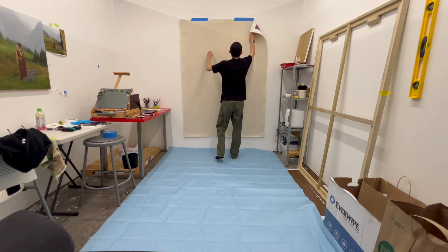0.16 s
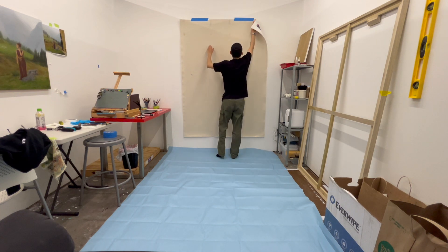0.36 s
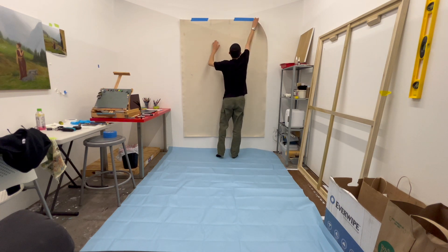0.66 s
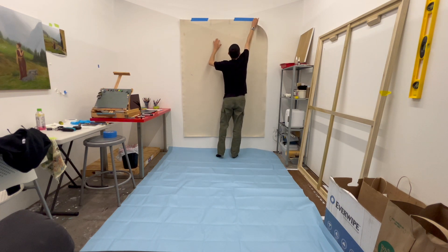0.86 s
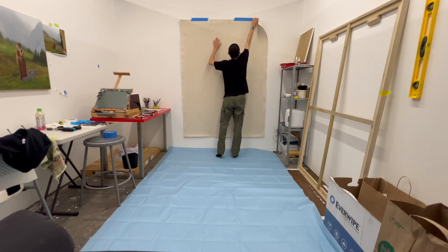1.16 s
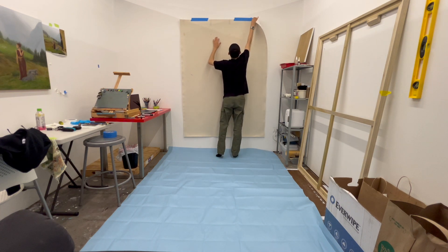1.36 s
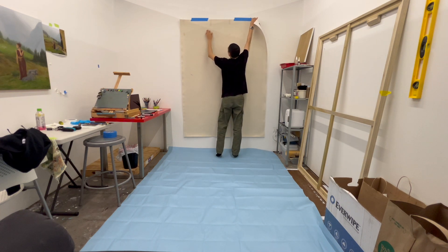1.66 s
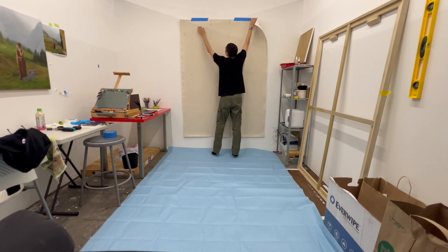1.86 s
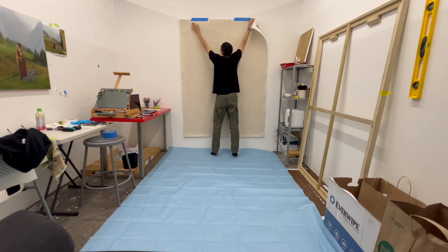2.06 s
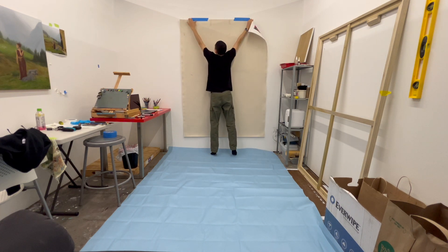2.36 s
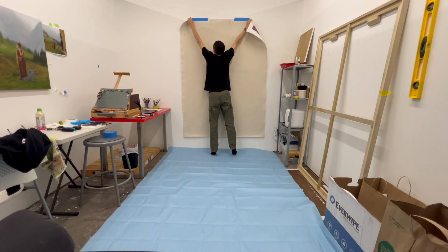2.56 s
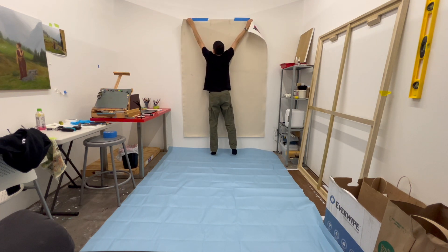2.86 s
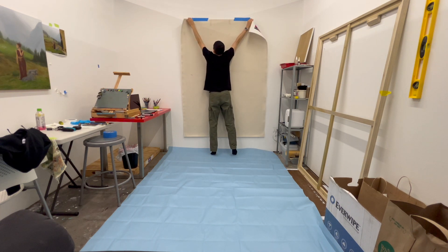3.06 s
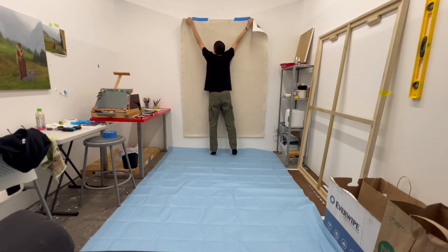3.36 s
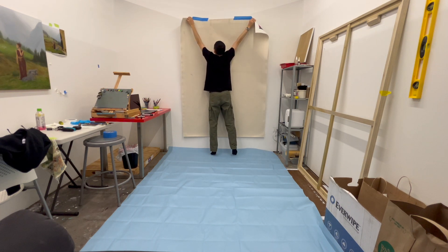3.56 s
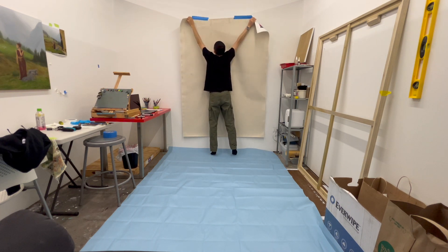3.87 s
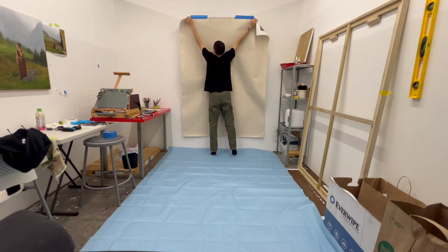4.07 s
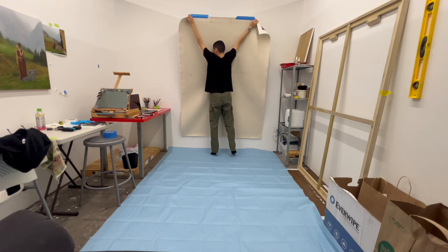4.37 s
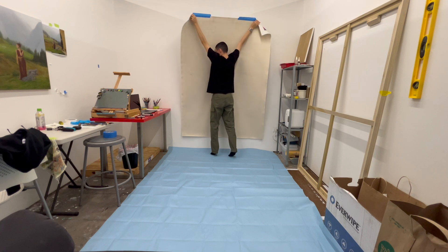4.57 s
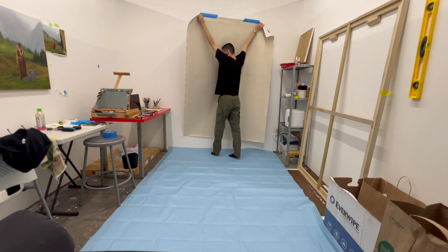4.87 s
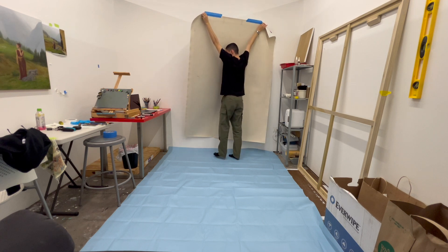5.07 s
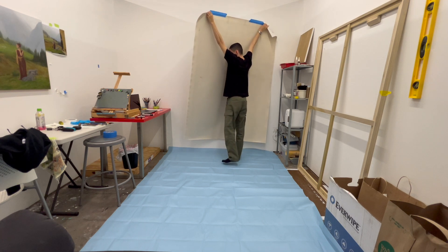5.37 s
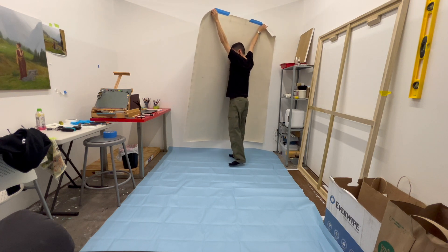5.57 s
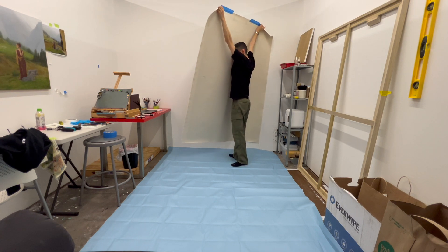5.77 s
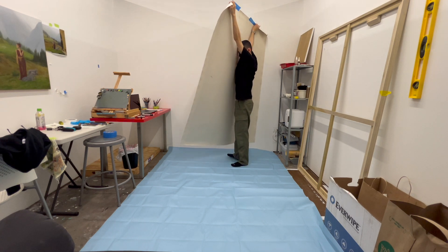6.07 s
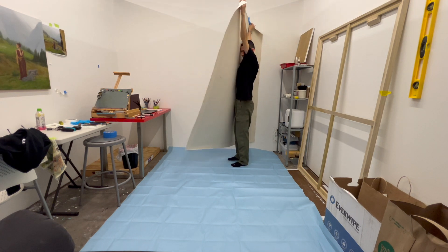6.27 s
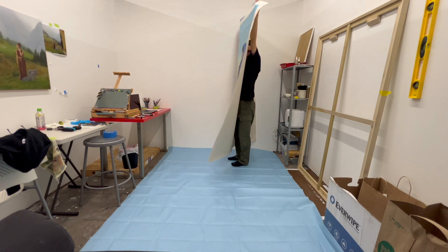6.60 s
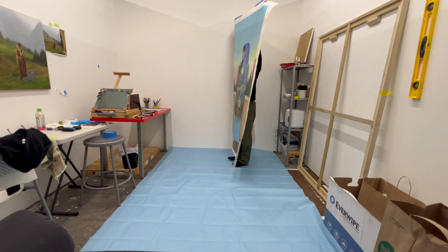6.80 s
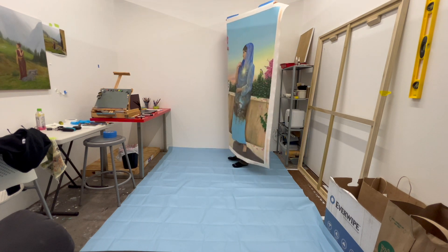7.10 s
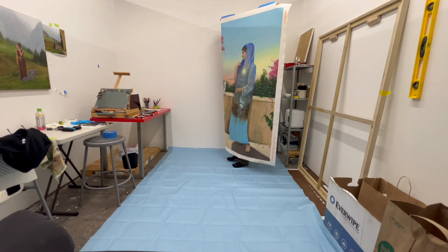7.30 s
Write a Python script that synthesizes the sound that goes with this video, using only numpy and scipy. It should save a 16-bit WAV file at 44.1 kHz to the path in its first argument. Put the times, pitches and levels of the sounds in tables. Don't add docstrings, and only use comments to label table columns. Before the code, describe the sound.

A low, steady fan hum with soft air noise runs throughout in a small bare studio, heard by a phone a few metres away with a short, blurring room echo. At 0 s a hand brushes cloth briefly, with a fainter stroke near 0.4 s. Around 1.1-1.35 s masking tape is tugged: a bright, dry crackle with sharp snaps and small creaks. Soft brushing fills 1.4-2.5 s. At 2.6 s a second peel starts with a snap, thin and fine at first, then rougher from 2.9 s, swelling at 3.3-3.5 s into dense crackling and hollow cloth drumming. Dull knocks follow at 3.6-3.8 s, and a last strong snatch with a thump at 3.85 s. From 4 s the freed canvas rustles in soft separate swishes, with faint knocks and snaps near 4.6, 5.0 and 5.6 s. A broader, smoother swish around 6.1-6.8 s turns it, then mostly hum remains.

```python
import sys
import numpy as np
from scipy import signal
from scipy.fft import rfft, irfft
from scipy.io import wavfile
from scipy.ndimage import uniform_filter1d

SR = 44100
rng = np.random.default_rng(int(sys.argv[2]) if len(sys.argv) > 2 else 0)


def waveform_to_disk(signal):
    frames = np.transpose(np.atleast_2d(signal))
    scaled = np.clip(frames, -1, 1) * 32767
    samples = np.round(scaled).astype(np.int16)
    wavfile.write(sys.argv[1], SR, samples)


def volts_from_db(level):
    exponent = np.asarray(level, float) / 20
    return 10 ** exponent


N = 328104
T = np.arange(N) / SR
HZ = np.maximum(np.arange(N // 2 + 1) * SR / N, 1)

# frequency in Hz, level in dB per Hz.
AIR = [(20, -31), (40, -4), (80, -14.5), (105, -8), (194, -11.5), (400, -18), (861, -28.5), (1300, -29),
       (2450, -34.5), (7000, -42.5), (8490, -44.5), (10000, -55), (13600, -62.5), (16000, -76.5)]
AIR_DB = -48.5
# centre in Hz, width in Hz, level in dB.
DUCT = [(42.55, 3, -61.5), (61.7, 29, -54.5), (148.1, 15, -53.5), (200.4, 20.4, -56.5)]
# frequency in Hz, level in dB, wobble in Hz.
MOTOR = [
    (57.6, -44, .1),
    (119.8, -60, .1),
]

# start in seconds, rise in seconds, fall in seconds,
# level in dB, brightness in dB.
STROKES = [(0.0, .01, 0.049, -51.5, -4), (0.35, .09, 0.14, -57.5, -8), (0.6, 0.18, 0.28, -73.5, 8.5),
           (0.98, 0.069, .06, -55, -11), (1.42, .1, .9, -56, -3), (1.84, 0.059, 0.25, -52, -6.5),
           (2.12, .3, 0.23, -68, 13.5), (2.42, 0.12, 0.68, -66, 1.5), (2.61, 0.027, .03, -58, -3),
           (3.99, .05, 0.14, -49, -7), (4.21, 0.19, 0.2, -52.5, -4.5), (4.5, .2, .1, -61, -6),
           (4.563, 0.02, 0.055, -52.5, -7.5), (4.76, 0.13, .03, -63, -9), (5.035, 0.23, 0.1, -56.5, -9),
           (5.56, 0.22, .15, -55.5, -16), (5.635, .035, 0.063, -48, -4.5), (5.72, .06, 0.14, -49, -1),
           (5.82, 0.14, 0.11, -51.5, -3), (5.97, 0.2, 0.36, -53, -7.5), (6.4, 0.39, 0.43, -46.5, -6.5),
           (6.72, 0.32, 0.12, -55, -3.5)]
STROKE_CURVE = 0.84
# frequency in Hz, level in dB per Hz.
WEAVE = [(470, -34), (800, -11.5), (1300, -12.5), (2210, -12.5), (6490, -7), (7640, -3), (8340, -3),
         (14300, -23), (16000, -19)]

# start in seconds, hold in seconds,
# film crackle in dB, weave buzz minus crackle in dB, cloth drum minus crackle in dB.
SNATCHES = [
    (0.98, 0.026, -53, -14, -30),
    (1.128, .01, -40, -9, -28),
    (2.614, .025, -43.5, -27, -40),
    (3.602, .02, -39.5, 1, 3.5),
    (3.848, 0.0069, -27, 0.5, -6),
]
# start in seconds, hold in seconds,
# film crackle in dB, weave buzz minus crackle in dB, cloth drum minus crackle in dB.
TUGS = [(1.155, .01, -37, -11, -26), (1.185, 0.015, -37, -8, -10), (1.23, 0.0089, -40.5, -6, -11),
        (1.262, 0.0077, -38.5, -3, -4), (1.328, 0.022, -51, -1.5, -5), (2.685, 0.021, -48.5, -25, -40),
        (2.77, 0.047, -57, -13, -18), (2.864, 0.032, -47.5, -4.5, -14), (2.949, 0.027, -40, -8, -8),
        (3.028, 0.029, -38, -12.5, -11), (3.086, 0.08, -39, 3.5, -7.5), (3.21, 0.057, -39.5, -1.5, -1.5),
        (3.279, 0.025, -36, 0, -1.5), (3.323, 0.015, -31.5, 0, 0.5), (3.352, 0.023, -28, -1, -2),
        (3.442, 0.011, -30, -11, -7.5), (3.48, 0.0073, -24.5, -7.5, -4), (3.563, 0.029, -42.5, -11, -9),
        (3.647, 0.02, -38, -2, 3), (3.733, 0.013, -37, -0.5, 0.5), (3.795, 0.018, -38.5, -8, 0),
        (3.938, .04, -48, -23, -24.5)]
TUG_RISE_S, SNATCH_RISE_S, TUG_RELEASE_S, TUG_CURVE = 0.098, 0.024, 0.15, 3.52
# frequency in Hz, level in dB per Hz.
FILM = [(1300, -19), (2000, -10.5), (3000, -8.5), (4200, -7), (5900, -3), (7600, -4), (8500, -2.5),
        (10900, -14.5), (14100, -19), (16000, -25.5)]
# centre in Hz, width in Hz, level in dB.
BUZZ = [(1200, 120, 2), (1870, 55, -1), (1470, 1100, 4.5)]
BRIGHT_HZ, FULL_HZ = 7700, 3900
BRIGHT_DB, DULL_SHARE = 2.5, 0.56
THIN_BELOW_DB, THIN_SLOPE = -14, 1.3

# centre in Hz, width in Hz, level in dB.
DRUM = [(230.6, 38, -8), (312.4, 8.9, -0.5), (380, 21.6, -0.5), (512, 56, -14), (594, 13.2, -5),
        (810, 310, -10)]
SLACK_S, TAUT_DB, SLACK_DB = 3.7, 2, -4.5

# start in seconds, peak in dB, centre in Hz.
SNAPS = [(1.128, -44, 7000), (1.168, -24, 6000), (1.191, -14.5, 6640), (1.205, -20.5, 6430),
         (1.225, -27.5, 5800), (2.618, -22.5, 7200), (2.6245, -31, 5200), (2.857, -43.5, 6000),
         (2.952, -36.5, 6800), (3.728, -39.5, 5800), (3.851, -23, 4500), (4.559, -37.5, 1880),
         (5.03, -44.5, 1620), (5.2416, -40.5, 3800), (5.619, -42, 4000)]
# start in seconds, peak in dB, centre in Hz.
CREAKS = [(1.157, -25.5, 2780), (1.176, -32, 1780), (1.192, -32, 1760), (1.203, -32, 2120),
          (1.255, -28, 5790), (2.635, -40, 6500), (2.64, -32.5, 4820), (2.667, -32.5, 5020),
          (2.678, -29, 9000), (3.06, -34.5, 1200), (3.12, -30.5, 1870), (3.17, -34, 1200),
          (3.28, -23.5, 635), (3.36, -21, 627)]
# start in seconds, peak in dB, centre in Hz.
KNOCKS = [(3.32, -28, 380), (3.345, -29, 360), (3.375, -27, 372), (3.597, -18.5, 380), (3.627, -28, 380),
          (3.66, -30.5, 387), (3.715, -23.5, 400), (3.738, -31, 390), (3.753, -25.5, 400),
          (3.793, -26, 370), (3.85, -15, 388), (3.874, -23, 400), (4.383, -36.5, 392), (4.563, -34, 307),
          (5.04, -40, 314)]

DIRECT_DB, WET_DB = 3.5, 1
T60_LOW_S, T60_HIGH_S, SPLIT_HZ = 0.23, 0.17, 4000
PORT_LAG = 28
SPOT_LAGS = [PORT_LAG, PORT_LAG, -5, 12, -19]

# frequency in Hz, likeness from -1 (opposite) to 1 (same).
LIKENESS = [(60, .9), (170, .9), (260, .75), (400, .3), (600, -.1), (950, -.4), (1250, 0), (10000, 0),
            (10800, -.75), (11300, -.8), (11900, 0), (12400, .95), (14300, .95), (15000, 0)]
# frequency in Hz, left minus right in dB.
LEAN = [(60, -.2), (260, -1.2), (450, 2), (2400, 2), (3600, 3.5), (5000, 8.5), (8500, 5.5), (9800, -1),
        (11000, 0)]
# centre in Hz, width in Hz, left in dB, right in dB.
NOTCH = [(1314, 110, 3, 5), (1810, 220, 4, 3), (5230, 157, -6, -10.5), (7650, 360, -16.5, -14),
         (11900, 750, 0, 0)]
TOP_HZ = 15400


def unit(x):
    return x / np.sqrt(np.mean(x ** 2))


def along(table):
    hz, value = np.transpose(table)
    return np.interp(np.log(HZ), np.log(hz), value)


def shape(x, gain):
    return irfft(rfft(x) * gain, N)


def tilt(x, db, hz, order):
    share = shape(x, 1 / (1 + (hz / HZ) ** order))
    return x + (volts_from_db(db) - 1) * share


def peak(hz, width):
    return 1 / (1 + 1j * (HZ ** 2 - hz ** 2) / (HZ * width))


def body(modes):
    return sum((-1) ** k * volts_from_db(db) * peak(hz, width) for k, (hz, width, db) in enumerate(modes))


def walk(rate):
    k = int(SR / rate)
    steps = np.repeat(rng.standard_normal(N // k + 1), k)
    return 1.42 * uniform_filter1d(uniform_filter1d(steps, k), k)[:N]


def slips(rate, spread_db):
    happens = rng.random(N) < rate / SR
    sign = rng.standard_normal(N)
    size = rng.exponential(size=N)
    return happens * sign * volts_from_db(spread_db * np.minimum(size, 3))


def steady(x, size):
    power = uniform_filter1d(uniform_filter1d(x ** 2, size), size)
    return x / np.sqrt(power)


def played(s, rise, hold, fall, curve, db, *columns):
    t = T[::32, None]
    coming = 1 + (t - s) / rise
    going = 1 + (s + hold - t) / fall
    power = volts_from_db(2 * db) * np.clip(np.minimum(coming, going), 0, 1) ** (2 * curve)
    total = power.sum(axis=1) + 1e-18
    curves = [np.sqrt(total)] + [power @ c / total for c in columns]
    return [np.interp(T, t[:, 0], c) for c in curves]


def ventilation():
    air = volts_from_db(AIR_DB) * unit(shape(rng.standard_normal((2, N)), volts_from_db(along(AIR))))
    duct = 0
    for hz, width, db in DUCT:
        rumble = unit(shape(rng.standard_normal((2, N)), peak(hz, width) ** 2))
        duct = duct + volts_from_db(db + 1.46 * walk(3)) * rumble
    motor = 0
    for hz, db, wobble in MOTOR:
        phase = 2 * np.pi * np.cumsum(hz + wobble * walk(1.8)) / SR
        motor = motor + volts_from_db(db + 0.85 * walk(1.6)) * np.sin(phase)
    return air + duct + motor


def brushing():
    s, rise, fall, db, bright_db = np.transpose(STROKES)
    level, bright_db = played(s, rise, 0, fall, STROKE_CURVE, db, bright_db)
    grains = slips(9000, 1.3) * volts_from_db(0.62 * walk(30))
    weave = unit(shape(grains, volts_from_db(along(WEAVE))))
    return volts_from_db(1.5) * level * tilt(weave, bright_db, 4800, order=6)


def tugs():
    s, hold, db, buzz_db, drum_db = np.transpose(TUGS + SNATCHES)
    rise = np.repeat([TUG_RISE_S, SNATCH_RISE_S], [len(TUGS), len(SNATCHES)])
    return played(s, rise, hold, TUG_RELEASE_S, TUG_CURVE, db, buzz_db, drum_db)


def tape():
    pull, buzz_db, _ = tugs()
    full_db = THIN_SLOPE * np.minimum(buzz_db - THIN_BELOW_DB, 0)
    fine = slips(8000, 4.1) * volts_from_db(1.4 * walk(130))
    film = steady(shape(fine, volts_from_db(along(FILM))), size=900)
    film = tilt(film, BRIGHT_DB + DULL_SHARE * full_db, BRIGHT_HZ, order=10)
    film = tilt(film, full_db, FULL_HZ, order=-14)
    coarse = slips(1200, 4.7) * volts_from_db(1.5 * walk(70))
    buzz = steady(shape(coarse, body(BUZZ)), size=1200)
    return pull * volts_from_db(4.5) * (film + volts_from_db(buzz_db - 5) * buzz)


def canvas():
    pull, _, drum_db = tugs()
    upper_db = np.interp(T, [SLACK_S - 0.03, SLACK_S + 0.025], [TAUT_DB, SLACK_DB])
    drum = steady(shape(slips(200, 1.7), body(DRUM) * peak(464, 827)), size=1500)
    return pull * volts_from_db(drum_db - 0.5) * tilt(drum, upper_db, 740, order=10)


def hits(table, burst_s, sharpness, boost_db):
    out, t = np.zeros(N + SR), np.arange(SR // 8) / SR
    for s, db, hz in table:
        burst = rng.standard_normal(len(t)) * np.exp(-t / burst_s)
        ring = np.exp(-np.pi * hz * t / sharpness) * np.sin(2 * np.pi * hz * t)
        hit = signal.fftconvolve(burst, ring)[:len(t)]
        start = int(s * SR)
        out[start:start + len(t)] += hit * volts_from_db(db + boost_db) / np.abs(hit).max()
    return out[:N]


def room(x, count=5):
    t = T[:SR // 2]
    noise = rng.standard_normal((count, 2, len(t)))
    low = signal.sosfilt(signal.butter(1, SPLIT_HZ, fs=SR, output="sos"), noise)
    low_fade = np.exp(-np.log(1000) * t / T60_LOW_S)
    high_fade = np.exp(-np.log(1000) * t / T60_HIGH_S)
    tail = low * low_fade + (noise - low) * high_fade
    tail *= (t > 0.004) * volts_from_db(WET_DB) / np.sqrt(np.sum(tail ** 2) / count / 2)
    delay = rng.integers(20, 120, (count, 1)) + np.outer(SPOT_LAGS, [1, 0])
    tail[np.arange(count)[:, None], [0, 1], delay] += 1
    share = np.array([walk(35) for _ in range(count)])
    share /= np.sqrt(np.sum(share ** 2, axis=0))
    heard = signal.oaconvolve((share * x)[:, None], tail, axes=2).sum(axis=0)[:, :N]
    return heard / np.sqrt(1 + volts_from_db(2 * WET_DB))


def scene():
    snaps = hits(SNAPS, 0.0012, 3.4, -1.5)
    creaks = hits(CREAKS, 0.0051, 18.0, -1.2)
    knocks = hits(KNOCKS, 0.0018, 4.9, -2.5)
    events = snaps + creaks + knocks
    no_bass = 1 / (1 + (220 / HZ) ** 4)
    pair = np.array([np.roll(events, PORT_LAG), events])
    straight = volts_from_db(DIRECT_DB) * shape(pair, no_bass) / np.sqrt(2)
    moving = tape() + canvas() + brushing() + events
    return ventilation() + room(shape(moving, no_bass)) + straight


def roll_off(x):
    return signal.sosfilt(signal.butter(12, 16460, fs=SR, output="sos"), x)


def record(dry):
    like = np.clip(along(LIKENESS), -0.99, 0.99)
    mid = rfft(dry[0] + dry[1]) * np.sqrt(1 + like) / 2
    side = rfft(dry[0] - dry[1]) * np.sqrt(1 - like) / 2
    left_db = along(LEAN) / 2
    right_db = -left_db
    for hz, width, left, right in NOTCH:
        bump = np.abs(peak(hz, width)) ** 2
        left_db = left_db + left * bump
        right_db = right_db + right * bump
    both = np.array([(mid + side) * volts_from_db(left_db), (mid - side) * volts_from_db(right_db)])
    ports = irfft(both * (HZ < TOP_HZ), N)
    ports = np.tanh(2 * ports) / 2
    return roll_off(ports)


dry = scene()
out = record(dry)
waveform_to_disk(out)
```